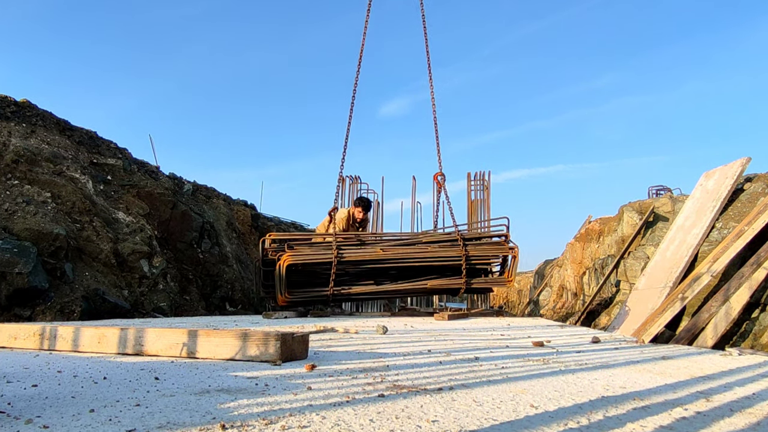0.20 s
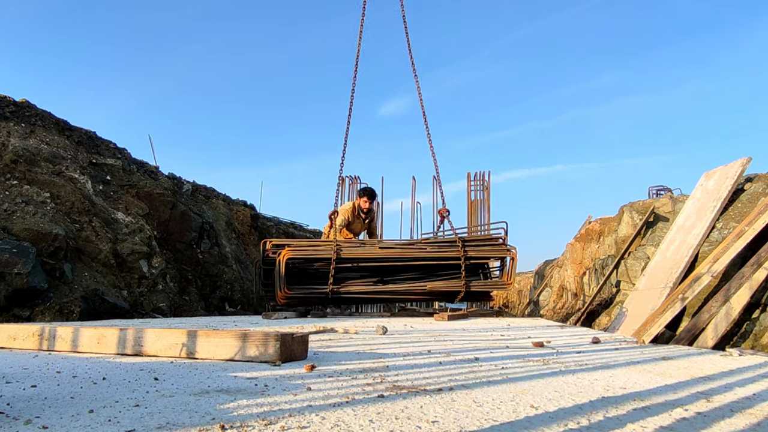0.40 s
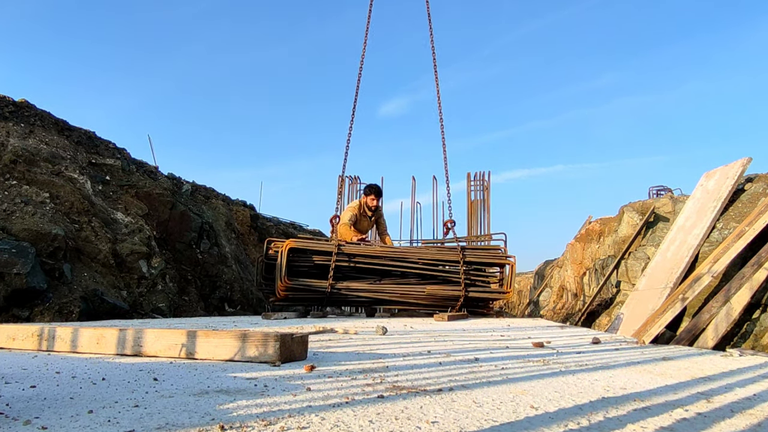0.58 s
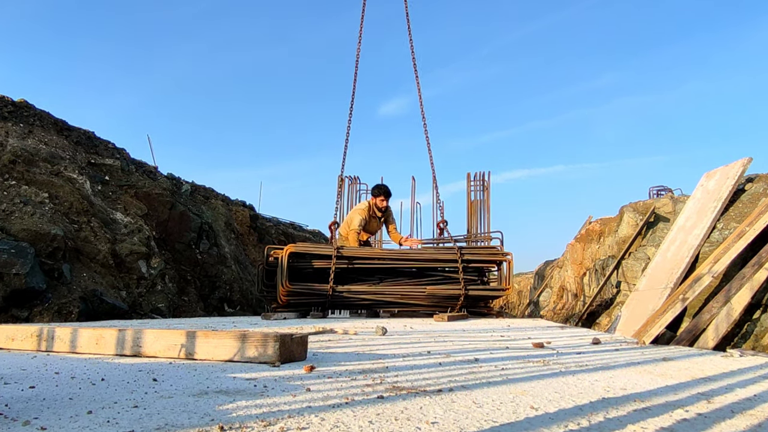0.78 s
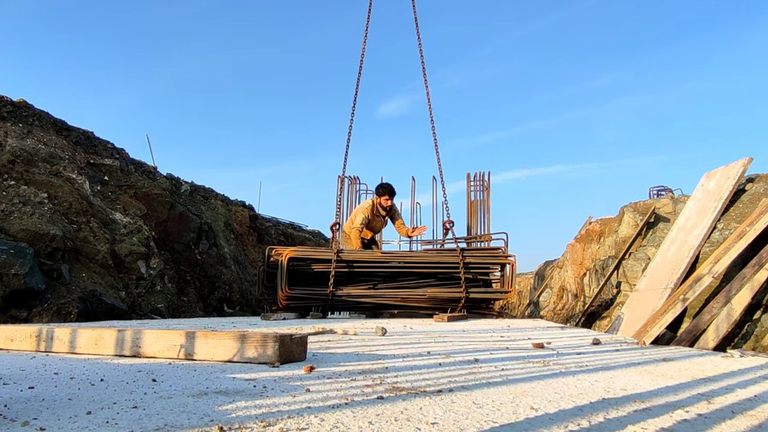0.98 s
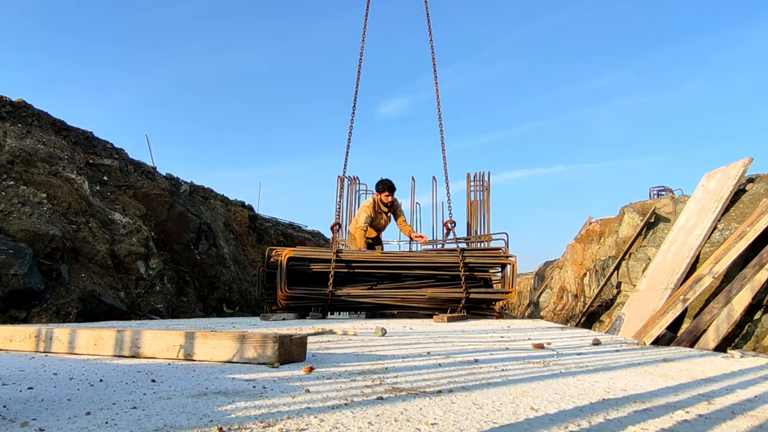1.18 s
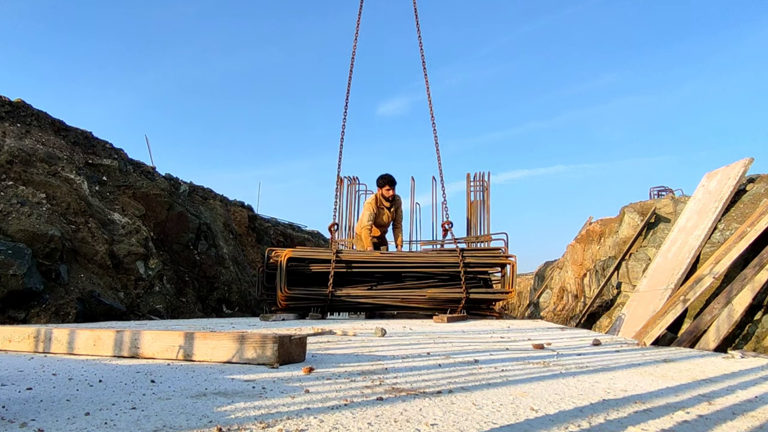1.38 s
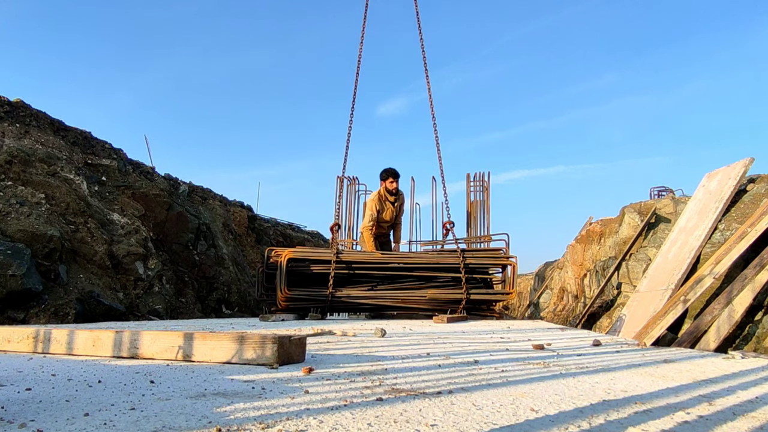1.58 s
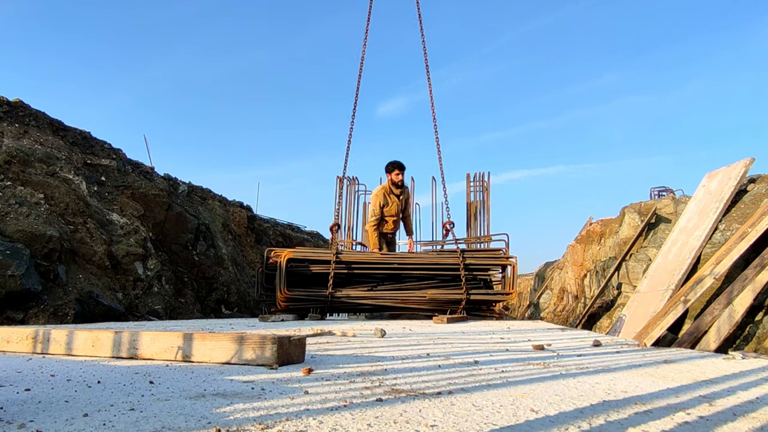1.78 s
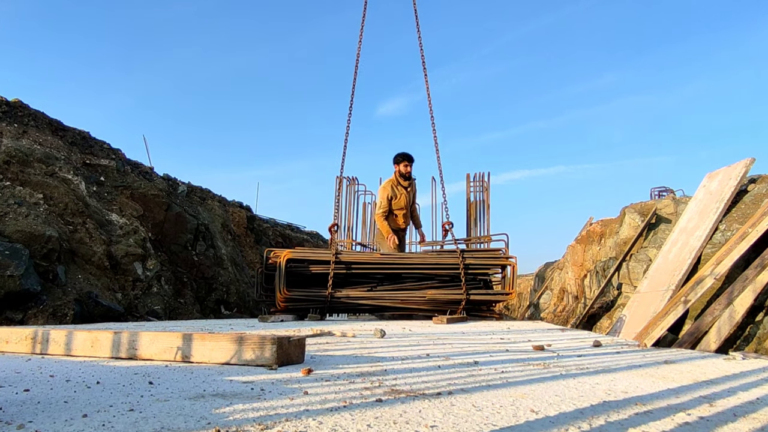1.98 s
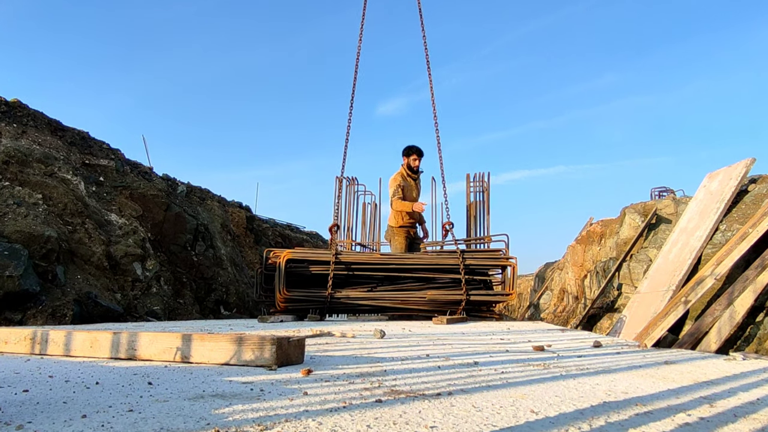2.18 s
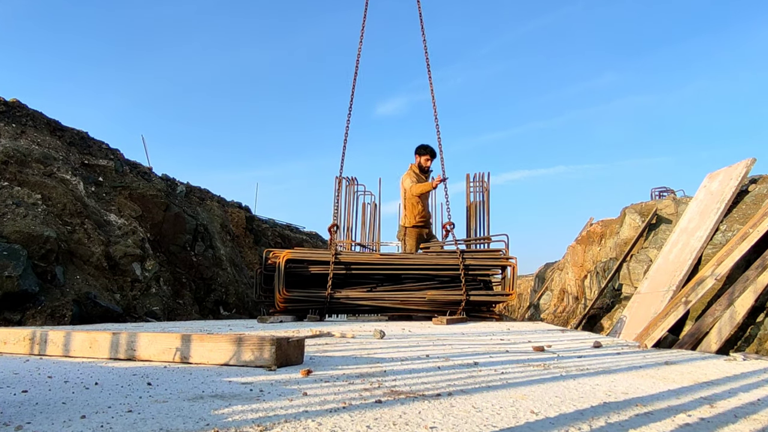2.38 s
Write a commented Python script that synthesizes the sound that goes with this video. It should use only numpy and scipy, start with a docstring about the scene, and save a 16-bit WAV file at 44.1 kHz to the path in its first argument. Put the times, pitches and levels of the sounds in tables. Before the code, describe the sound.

Steel reinforcing bars clatter and crash onto a slab, then chains clink over an idling diesel

```python
"""Steel reinforcing bars knock and rattle as a crane sets their bundle down on a concrete slab in an open pit:
contacts excite decaying noise and scattered modes. Two late bars slap down with a crack and a shiver;
the load thuds and knocks in damped modes, and slack lifting chains clink with high decaying sines.
A diesel engine idles throughout (wavering tones over noise); a puff of air pushes on the microphone."""
import sys
import numpy as np
from scipy import signal
from scipy.fft import rfft, irfft
from scipy.io import wavfile

SR = 44100
rng = np.random.default_rng(int(sys.argv[2]) if len(sys.argv) > 2 else 0)


def to_wav(sig):
    """Store sig (one row per channel, or 1-D mono) as 16-bit WAV at the path in sys.argv[1].

    Samples outside -1..1 are clipped; the rate is SR.
    """
    pcm = np.clip(np.atleast_2d(sig), -1, 1) * 32767
    pcm = np.round(pcm).astype(np.int16)
    wavfile.write(sys.argv[1], SR, pcm.T)  # frames by channels


N = 110250
TIME_S = np.arange(N) / SR
RING_SAMPLES = SR // 2
STEEL_CORRELATION, THUD_CORRELATION = 0.013, 0.79  # left-right


def from_db(db):
    """Decibels to amplitude gain."""
    return 10 ** (np.asarray(db) / 20)


def at_hz(points, size=N):
    """Interpolate a table over log frequency at the FFT bins of size samples."""
    hz, value = np.transpose(points)
    bins_hz = np.fft.rfftfreq(size, 1 / SR) + 1e-9
    return np.interp(np.log(bins_hz), np.log(hz), value)


def at_time(points):
    """Interpolate a table over time at every sample."""
    return np.interp(TIME_S, *np.transpose(points))


def unit(x):
    """Scale to mean energy 1 per channel."""
    return x / np.sqrt(np.mean(np.sum(x ** 2, axis=-1)) + 1e-20)


def decay(t, t60_s):
    """Exponential envelope that falls 60 dB in t60_s."""
    return np.exp(-np.log(1000) * t / t60_s)


def drift(rate_hz):
    """Low-passed noise with mean 0 and standard deviation 1."""
    lowpass = 1 + (np.fft.rfftfreq(N, 1 / SR) / rate_hz) ** 4
    slow = irfft(rfft(rng.standard_normal(N)) / lowpass, N)
    return (slow - slow.mean()) / slow.std()


def noise(colour, correlation, size=N, count=0):
    """Coloured stereo noise of rms 1; a nonzero count keeps about that many random FFT bins as modes."""
    mid, side = rfft(rng.standard_normal((2, size)))
    alike = np.clip(correlation, -1, 1)
    common = np.sqrt(1 + alike) * mid
    opposed = np.sqrt(1 - alike) * side * [[1], [-1]]
    spectrum = (common + opposed) * from_db(at_hz(colour, size))
    if count:
        spectrum = spectrum * (rng.random(len(mid)) < count / len(mid))
    return unit(irfft(spectrum, size)) * np.sqrt(size)


def dying(colour, correlation, t60_s, count=0):
    """Dense or scattered modes under one exponential decay; energy 1."""
    modes = noise(colour, correlation, RING_SAMPLES, count=count)
    return unit(modes * decay(TIME_S[:RING_SAMPLES], t60_s))


def play(clicks, response):
    """Contacts set a body ringing: convolution with its impulse response."""
    return signal.fftconvolve(np.atleast_2d(clicks), response, axes=1)[:, :N]


def add(out, start_s, sound):
    """Mix a sound in at start_s."""
    start = int(start_s * SR)
    out[:, start:start + sound.shape[1]] += sound[:, :N - start]


def tilted(colour, db_per_octave):
    """A harder contact tips the colour towards the treble, about a 5500 Hz pivot."""
    return [(hz, level + db_per_octave * np.log2(hz / 5500)) for hz, level in colour]


REBOUND_DB = -4.5  # rms re first contact


def rebounds(spread_s, count=10):
    """A first contact and a quick run of random rebounds at gamma-distributed delays."""
    clicks = np.zeros(SR // 10)
    delays = rng.gamma(2, .5, count) * spread_s * SR
    at = np.clip(delays, 1, len(clicks) - 1).astype(int)
    clicks[at] = from_db(REBOUND_DB) * rng.standard_normal(count)
    clicks[0] = 1
    return clicks


# levels re the crash of neighbouring bars
TICK_DB, TICK_T60_S = -8.5, 0.0089
PING_DB, PING_T60_S = -7, 0.081
BAR_RING_DB, BAR_T60_S = -12, 0.41


def steel(colour, crash_t60_s, correlation=STEEL_CORRELATION, ring_count=200, ping_count=50):
    """Steel in a heap: hard tick, a few short pings, a crash of neighbours and longer modes; energy 1."""
    tick = from_db(TICK_DB) * dying(colour, correlation, TICK_T60_S)
    pings = from_db(PING_DB) * dying(colour, correlation, PING_T60_S, count=ping_count)
    crash = dying(colour, correlation, crash_t60_s)
    ring = from_db(BAR_RING_DB) * dying(colour, STEEL_CORRELATION, BAR_T60_S, count=ring_count)
    return unit(tick + pings + crash + ring)


# fixed engine tones: (frequency [Hz], mean level [dB rms])
ENGINE_LINES = [(78.3, -42), (124.5, -49.5), (155.5, -46.5), (194, -49.5)]
# lowest engine tone: (time [s], level before swell [dB rms])
DRONE = [(0, -38.5), (0.25, -32), (0.5, -45), (0.68, -32.5), (1.15, -57), (1.55, -31.5), (1.8, -39.5),
         (2.25, -48), (2.45, -38)]
# exhaust and site rumble spectrum: (frequency [Hz], relative level [dB per Hz])
RUMBLE = [(20, -5.5), (45, 4), (65, -2.5), (100, -4.5), (170, -6), (300, -12.5), (1000, -21), (2000, -25.5),
          (4000, -38.5), (14000, -56)]
# rumble stereo likeness: (frequency [Hz], left-right correlation [-1..1])
RUMBLE_CORRELATION = [(150, 0.95), (400, 0.61), (1000, 0.043), (3000, 0.066)]
DRONE_HZ, RUMBLE_DB = 45.34, -36
SWELL_DB, SWELL_HZ = 1.5, 2.04
WAVER_RAD, WAVER_HZ = 0.4, 5.5


def engine():
    """Tones wavering in phase and level over the noise rumble of the exhaust and the site."""
    tones = np.zeros(N)
    for hz, db in [(DRONE_HZ, at_time(DRONE)), *ENGINE_LINES]:
        gain = np.sqrt(2) * from_db(db + SWELL_DB * drift(SWELL_HZ))
        turn = 2 * np.pi * (hz * TIME_S + rng.random())
        tones += gain * np.sin(turn + WAVER_RAD * drift(WAVER_HZ))
    return tones + from_db(RUMBLE_DB) * noise(RUMBLE, at_hz(RUMBLE_CORRELATION))


# air on the microphone: (time [s], pressure before panning [full scale], rise [s], fall constant [s])
PUFFS = [(0.82, -0.23, 0.0183, 0.016), (0.859, 0.086, .06, 0.062), (0.932, 0.141, 0.0093, 0.072)]
PUFF_LEFT_DB = 5  # right gets the opposite


def puff():
    """Slow pressure swings: quadratic rise, exponential fall, stronger on the left."""
    push = np.zeros(N)
    for start_s, pressure, rise_s, fall_s in PUFFS:
        rise = np.clip((TIME_S - start_s) / rise_s, 0, 1) ** 2
        fall = np.exp(-np.maximum(TIME_S - start_s - rise_s, 0) / fall_s)
        push += pressure * rise * fall
    return push * from_db(PUFF_LEFT_DB * np.array([[1], [-1]]))


DIP_S, DIP_LENGTH_S, DIP_DB, DIP_BELOW_HZ = 0.879, 0.095, -10, 1500


def dip(x):
    """The low end sinks briefly and comes back: a zero-phase low band under a flat-topped window."""
    lows = signal.sosfiltfilt(signal.butter(1, DIP_BELOW_HZ, fs=SR, output="sos"), x)
    inside = np.exp(-(2 * (TIME_S - DIP_S) / DIP_LENGTH_S) ** 6)
    return x - lows * (1 - from_db(DIP_DB * inside))


# dull knocks in and around the bundle: (time [s], level of dull part [dB], pitch [Hz])
KNOCKS = [(0.099, -12.5, 2017), (0.650, -2.5, 1480), (1.575, -19, 1330), (2.173, -17.5, 1540)]
# thump of the bundle coming to rest: (frequency [Hz], relative level [dB per Hz])
REST_COLOUR = [(120, -5), (450, 0), (1100, -4), (2000, -18)]
KNOCK_T60_S, KNOCK_RING_DB, KNOCK_RING_T60_S = 0.078, -4.5, 0.05  # ring re dull part
REST_S, REST_DB, REST_T60_S = .833, 8, 0.044


def knocks():
    """Dull noise bursts around one quickly damped resonance each, and one broad, dead thump."""
    out, t = np.zeros((2, N)), TIME_S[:RING_SAMPLES]
    for start_s, db, hz in KNOCKS:
        colour = [(hz / 4, -16), (hz * 0.73, -6), (hz, 0), (hz * 1.12, -10), (hz * 3.8, -32), (hz * 6, -55)]
        dull = dying(colour, THUD_CORRELATION, KNOCK_T60_S)
        ring = unit(np.sin(2 * np.pi * hz * t) * decay(t, KNOCK_RING_T60_S))
        add(out, start_s, from_db(db) * (dull + from_db(KNOCK_RING_DB) * ring))
    add(out, REST_S, from_db(REST_DB) * dying(REST_COLOUR, THUD_CORRELATION, REST_T60_S))
    return out


# chain links: (time [s], level [dB re CHAIN_DB for the hit, LINK_DB for the ring],
#               rebound spread [s], lower ring [dB], upper ring [dB])
CLINKS = [(1.318, -7, 0.0027, -11, -15), (1.3352, -7.5, 0.00046, -7, 7.5), (1.365, -4.5, 0.009, -10, -22),
          (1.435, -8.5, 0.00048, -18, -3.5), (1.458, -3, 0.0082, -36, -38), (1.479, -1.5, 0.0038, -18, 1.5),
          (1.662, -11, 0.0047, -7, -10), (1.6847, -9.5, .008, -7, -5), (1.725, -12, 0.00755, -2, 2),
          (1.753, -6, 0.0087, -27, -18), (1.968, -8, 0.0074, -16, -12.5), (1.981, -5.5, 0.00309, 6.5, 1.5),
          (2.028, -3, 0.0043, -6, -23), (2.106, -26.5, 0.0063, 11, -20), (2.241, -14, .003, -8, -5.5),
          (2.285, -15.5, 0.0047, -6, -2.5), (2.298, -12.5, 0.0069, -9, 4.5),
          (2.3637, -10, 0.00151, -12, -3), (2.387, -11, 0.0038, -11, -15), (2.401, -9, 0.0057, -0.5, -8),
          (2.4757, -10, 0.005, 0, 3.5)]
# a link's own modes: (nominal frequency [Hz], relative level [dB], T60 [s])
LINK_MODES = [(5650, -0.5, 0.065), (8620, -2.5, 0.06), (11300, -17.5, 0.15), (12900, -19, 0.16)]
# link hit spectrum: (frequency [Hz], relative level [dB per Hz])
CHAIN_COLOUR = [(400, -2), (1200, -7), (2400, 2.5), (5000, 1.5), (7500, 4), (8800, -2.5), (9800, -10),
                (14000, -14)]
CHAIN_DB, CHAIN_T60_S, CHAIN_CORRELATION = -2.5, 0.2, 0.24
RIGHT_DELAY_S = 0.00049  # hits reach the left ear first
LINK_DB, LINK_DETUNE, UPPER_RING_HZ = -29, .004, 7000  # detune: relative standard deviation


def chains():
    """Links hit the bars and ring with a few high modes, randomly detuned from link to link."""
    hits, rings, t = np.zeros((2, N)), np.zeros((2, N)), TIME_S[:RING_SAMPLES // 2]
    for start_s, db, spread_s, lower_db, upper_db in CLINKS:
        body = steel(CHAIN_COLOUR, CHAIN_T60_S, CHAIN_CORRELATION)
        hit = unit(play(rebounds(spread_s, count=6), body))
        add(hits, start_s, from_db(CHAIN_DB + db) * hit)
        for hz, mode_db, t60_s in LINK_MODES:
            ring_db = upper_db if hz > UPPER_RING_HZ else lower_db
            detuned_hz = hz * (1 + LINK_DETUNE * rng.standard_normal())
            turn = 2 * np.pi * detuned_hz * t + rng.standard_normal((2, 1)) / 2
            gain = from_db(LINK_DB + db + ring_db + mode_db)
            add(rings, start_s, gain * np.sin(turn) * decay(t, t60_s))
    delayed_right = np.roll(hits[1], int(RIGHT_DELAY_S * SR))
    return np.array([hits[0], delayed_right]) + rings


# weight landing on the timber bearers: (time [s], level [dB re THUD_DB], cluster centre [Hz])
THUDS = [(0.262, 3, 777), (0.300, -0.5, 713), (0.485, -3.5, 408), (0.543, 2.5, 385), (0.578, -1.5, 380),
         (0.690, -5.5, 700), (0.775, -2.5, 407), (0.800, -3.5, 390), (1.036, -9, 590)]
# dense part of a thud: (frequency [Hz], relative level [dB per Hz])
THUD_COLOUR = [(100, -4), (230, -2.5), (390, 6.5), (520, -4.5), (800, 1.5), (1300, -6), (2500, -11),
               (6000, -47.5)]
THUD_DB, THUD_T60_S = 0.5, 0.31
THUD_RING_DB, THUD_WIDTH = -5.5, 0.3  # cluster re dense part; relative half-width


def thuds():
    """Low, short ring of the whole load: dense modes plus a cluster that depends on where it bears."""
    out = np.zeros((2, N))
    for start_s, db, hz in THUDS:
        low_hz, high_hz = hz / (1 + THUD_WIDTH), hz * (1 + THUD_WIDTH)
        cluster_colour = [(hz / 2, -90), (low_hz, -20), (hz, 0), (high_hz, -20), (hz * 2, -90)]
        cluster = dying(cluster_colour, THUD_CORRELATION, THUD_T60_S)
        dense = dying(THUD_COLOUR, THUD_CORRELATION, THUD_T60_S)
        add(out, start_s, from_db(THUD_DB + db) * unit(dense + from_db(THUD_RING_DB) * cluster))
    return out


# late bars: (time [s], level [dB re BAR_DB], rebound spread [s], tilt [dB/octave], left over right [dB])
SLAPS = [(1.035, -1.5, .001, 5.5, 1.3), (1.150, -4.5, .0035, -1.5, 0.88)]
# crack spectrum before tilt: (frequency [Hz], relative level [dB per Hz])
SLAP_COLOUR = [(300, -20), (1500, -17.5), (3200, -4.5), (7300, 5.5), (9600, -2), (14000, -14)]
CRACK_T60_S, SHIVER_DB, SHIVER_T60_S = 0.11, -5.5, 0.264  # shiver re crack


def slaps():
    """A loose bar lands flat with a bright crack; the bundle's modes shiver with a longer decay."""
    out = np.zeros((2, N))
    for start_s, db, spread_s, tilt, pan_db in SLAPS:
        crack = dying(tilted(SLAP_COLOUR, tilt), STEEL_CORRELATION, CRACK_T60_S)
        shiver = from_db(SHIVER_DB) * dying(BAR_COLOUR, STEEL_CORRELATION, SHIVER_T60_S)
        slap = unit(play(rebounds(spread_s, count=6), crack + shiver))
        add(out, start_s, from_db(BAR_DB + db + pan_db * np.array([[.5], [-.5]])) * slap)
    return out


# bar strikes bar: (time [s], level [dB re BAR_DB], rebound spread [s], tilt [dB/octave])
CLASHES = [(0.235, -20.5, 0.0037, -5), (0.248, -7.5, 0.0062, 0), (0.2597, -2, 0.0038, 5.5),
           (0.291, -5, .012, 1.5), (0.404, -10, .012, 0), (0.425, -7.5, 0.014, -1),
           (0.444, -2.5, 0.0075, 4.5), (0.506, -12, 0.011, 10), (0.536, -4.5, 0.0056, 2),
           (0.554, -7, 0.007, 4), (0.588, -8, 0.0073, 1), (0.627, -7, .006, 3), (0.646, -3.5, 0.0094, -0.5),
           (0.677, -1, 0.0045, 6.5), (0.700, -5, .015, -1.5), (0.735, -6.5, 0.0076, 2.5),
           (0.756, -5.5, .006, 1), (0.7711, -.5, .003, 2.5), (0.786, -2, .008, 2.5), (0.823, -1.5, .008, 5),
           (0.987, -13.5, 0.0011, -0.5), (1.016, -12, 0.0041, -1), (1.213, -15, 0.01103, -0.5),
           (1.245, -17.5, 0.014, -3)]
# grind and rattle of the settling bundle: (time [s], contact level before surges [dB])
RATTLE = [(0.24, -72), (0.27, -22), (0.35, -28), (0.45, -21.5), (0.50, -22.5), (0.57, -21), (0.615, -26),
          (0.69, -18), (0.80, -27), (0.86, -30), (0.96, -29), (1.06, -37), (1.13, -42.5), (1.23, -30.5),
          (1.34, -58), (1.55, -48), (1.63, -59.5), (1.75, -45), (1.87, -53.5), (2.15, -59), (2.5, -65)]
# bar spectrum before tilt: (frequency [Hz], relative level [dB per Hz])
BAR_COLOUR = [(200, -28), (400, -14), (1200, -8.5), (2200, -1), (4500, 0.5), (6000, -2), (7200, 2.5),
              (8700, -7.5), (9700, -13), (14000, -18)]
BAR_DB, CRASH_T60_S = 16, 0.15
CONTACTS_PER_S, CONTACT_SPREAD_DB = 1500, 5.5  # spread: scale of an exponential draw
SURGE_DB, SURGE_HZ = 1.5, 70


def bundle(count=7):
    """Clashes plus a surging rattle of random small contacts, dealt to several bars."""
    bars = [steel(BAR_COLOUR, CRASH_T60_S) for _ in range(count)]
    size_db = CONTACT_SPREAD_DB * np.minimum(rng.exponential(1, N), 3.2)
    sizes = from_db(size_db) * rng.choice([-1, 1], N)
    contacts = unit(sizes * (rng.random(N) < CONTACTS_PER_S / SR)) * np.sqrt(N)
    contacts *= from_db(at_time(RATTLE) + SURGE_DB * drift(SURGE_HZ))
    contacts *= TIME_S > RATTLE[0][0]
    dealt = rng.integers(0, count, N)
    out = sum(play(contacts * (dealt == k), bar) for k, bar in enumerate(bars))
    for start_s, db, spread_s, tilt in CLASHES:
        bar = steel(tilted(BAR_COLOUR, tilt), CRASH_T60_S)
        add(out, start_s, from_db(BAR_DB + db) * unit(play(rebounds(spread_s), bar)))
    return out


PIT_ECHO_DB, PIT_T60_S = -22, 0.64


def scene():
    """The steel with a faint decaying-noise wash from the pit walls, over the engine; puff on top."""
    load = knocks() + chains() + thuds() + slaps() + bundle()
    wash = play(load, dying([(2500, 51.0), (14000, -45.5)], 0, PIT_T60_S))
    return dip(engine() + from_db(PIT_ECHO_DB) * wash + load) + puff()


# microphone port difference: (frequency [Hz], left over right [dB])
LEFT_LEAD = [(1500, 0.5), (3000, -1), (7900, 0), (8600, 13), (9500, 0)]
CEILING, CUTOFF_HZ = .9, 14200  # ceiling: full scale, before the cut


def record(dry):
    """Two microphone ports colour the treble differently; high peaks are rounded and the top is cut."""
    ports = from_db(at_hz(LEFT_LEAD, 2 * N) * np.array([[.5], [-.5]]))
    heard = irfft(rfft(dry, 2 * N) * ports)
    rounded = heard / (1 + (heard / CEILING) ** 6) ** (1 / 6)
    top = 1 / np.sqrt(1 + (np.fft.rfftfreq(2 * N, 1 / SR) / CUTOFF_HZ) ** 400)
    return irfft(rfft(rounded) * top)[:, :N]


dry = scene()
out = record(dry)
to_wav(out)
```